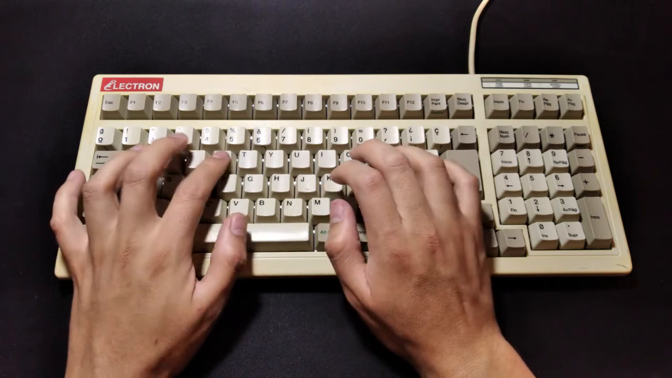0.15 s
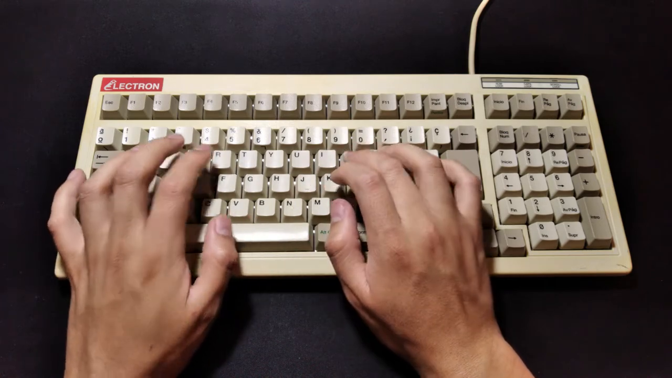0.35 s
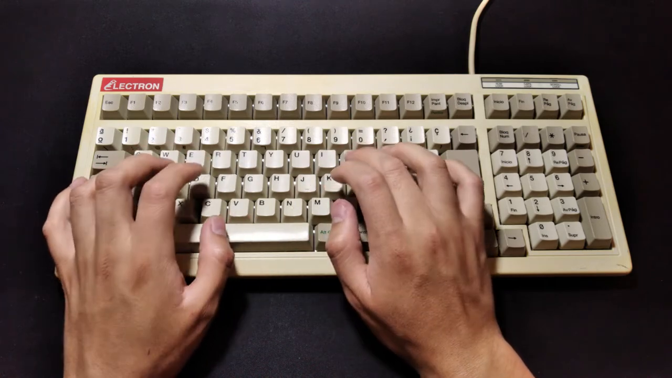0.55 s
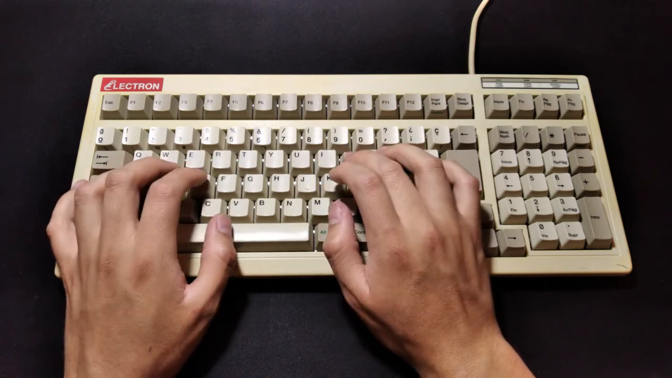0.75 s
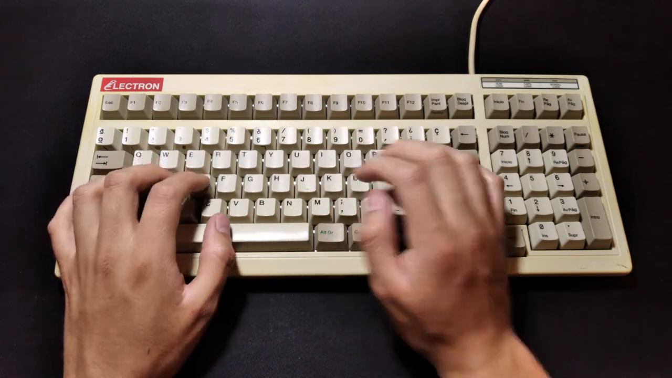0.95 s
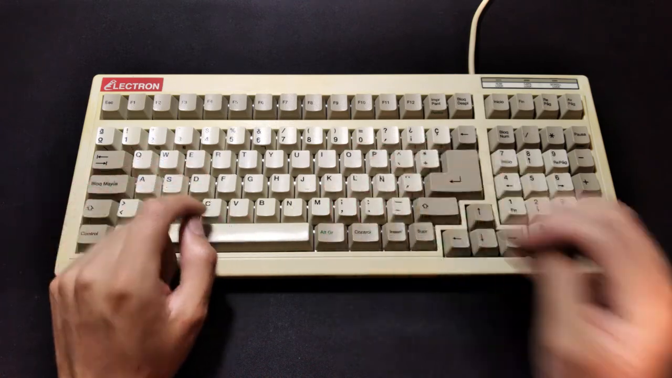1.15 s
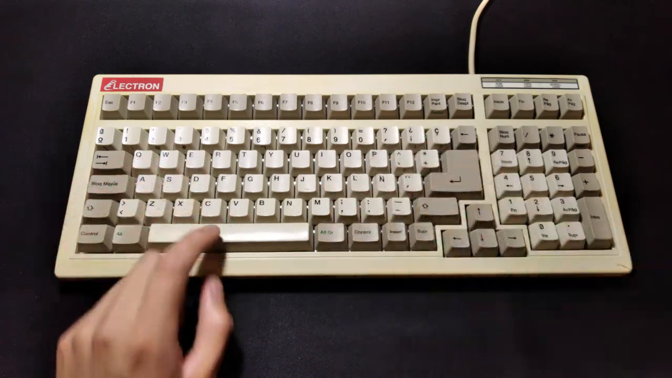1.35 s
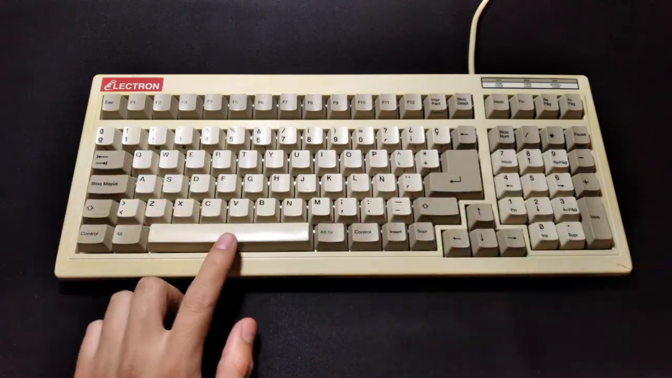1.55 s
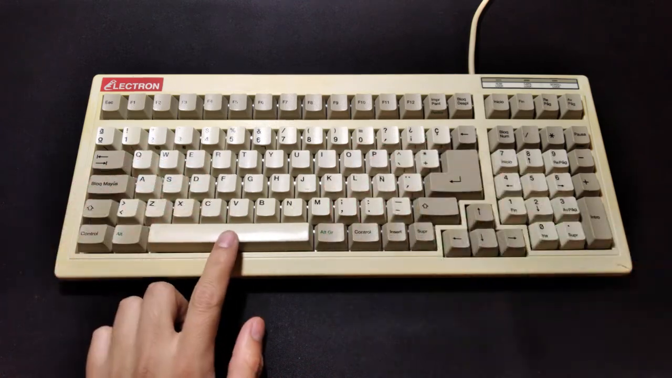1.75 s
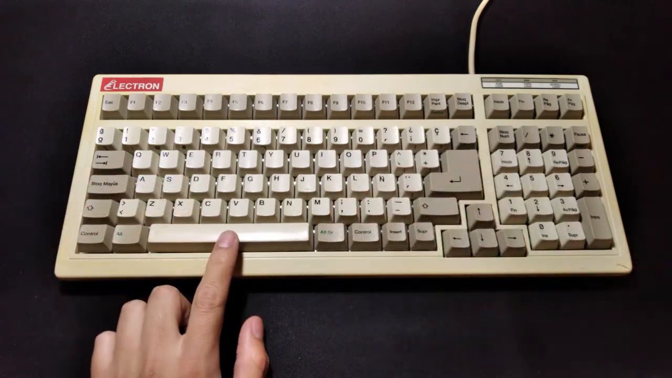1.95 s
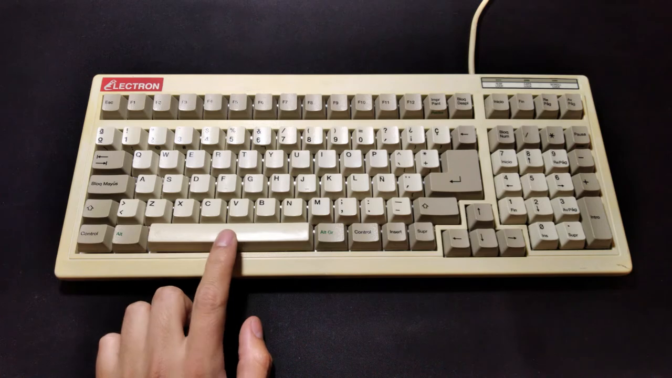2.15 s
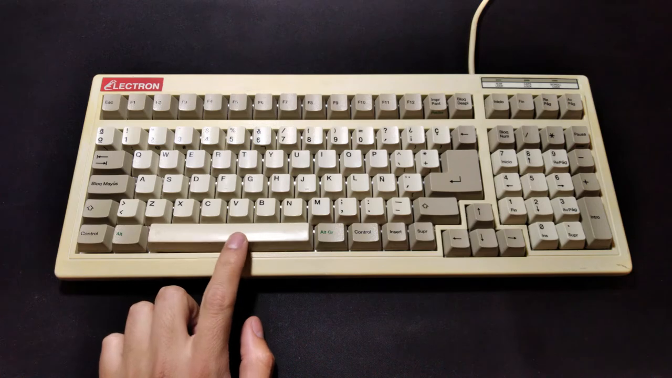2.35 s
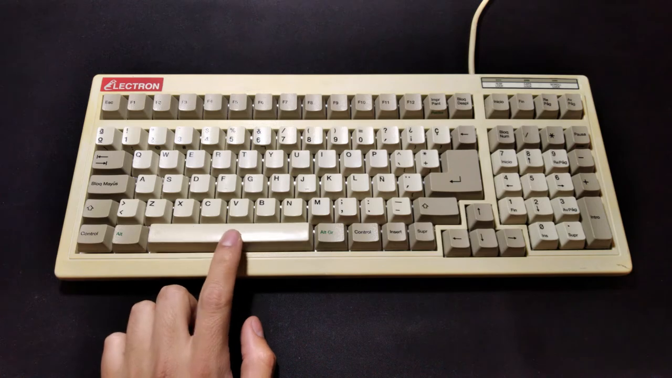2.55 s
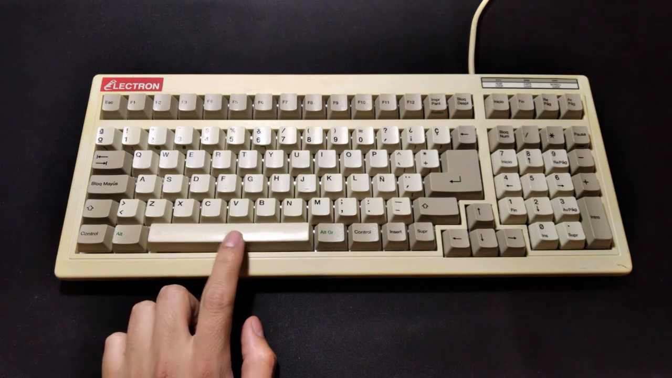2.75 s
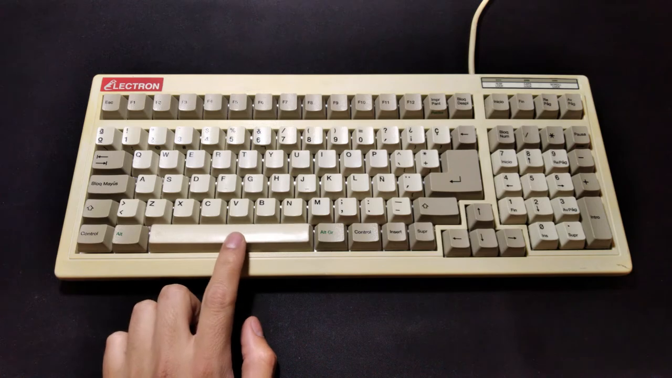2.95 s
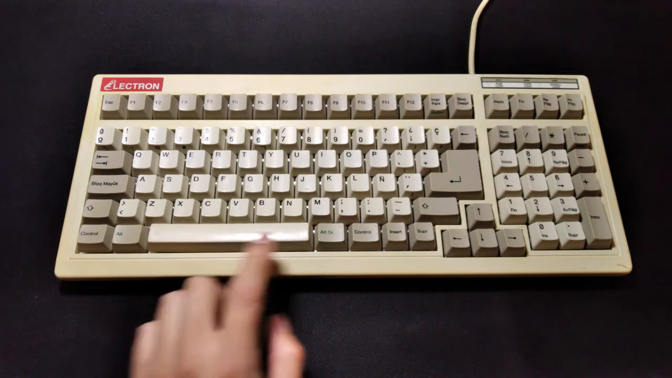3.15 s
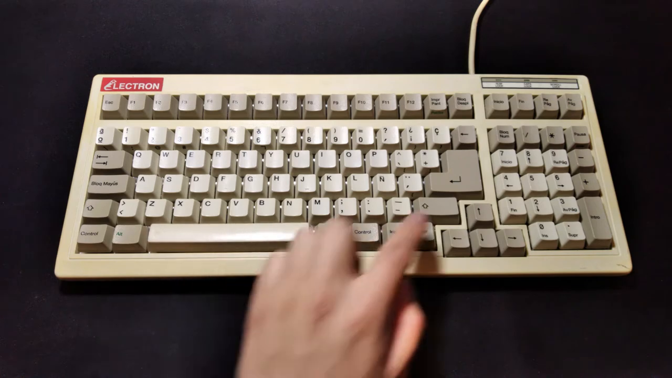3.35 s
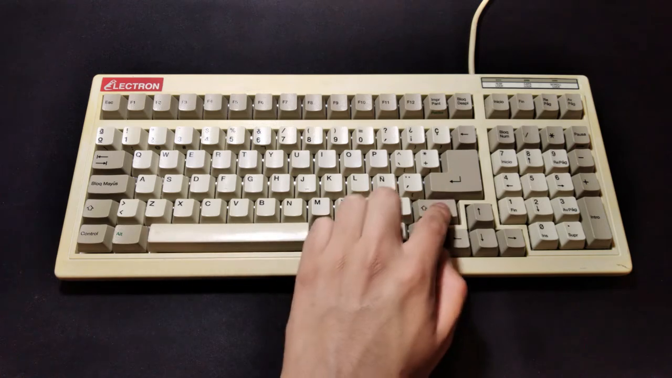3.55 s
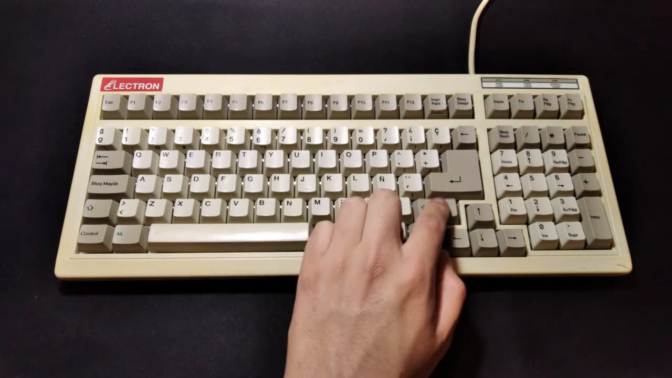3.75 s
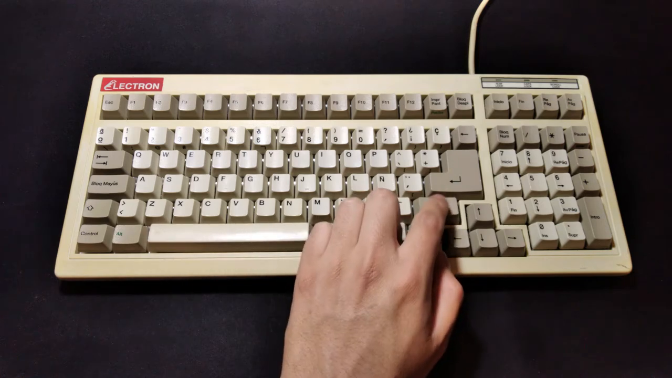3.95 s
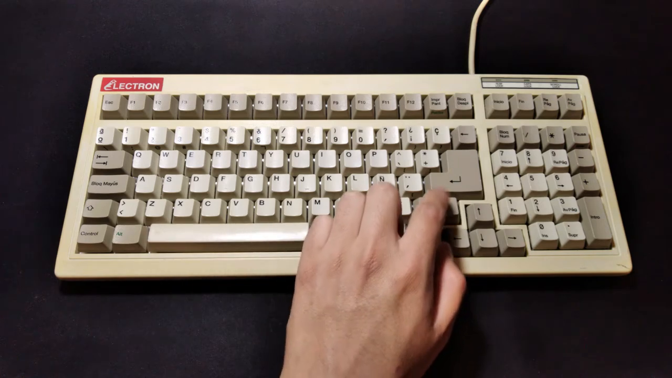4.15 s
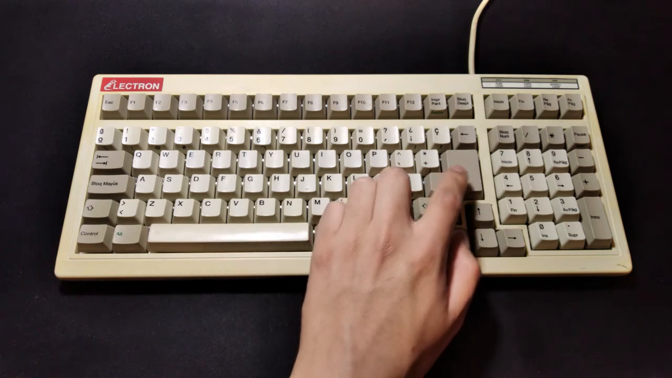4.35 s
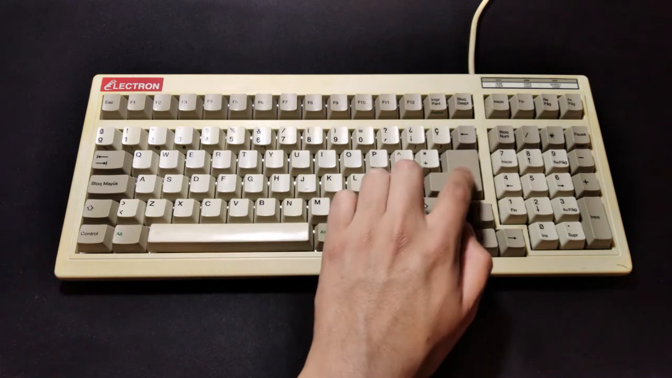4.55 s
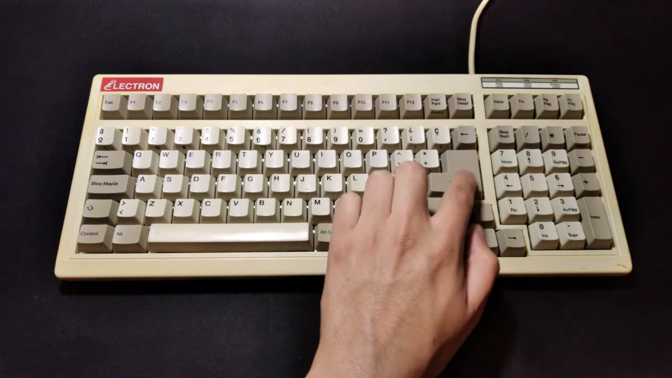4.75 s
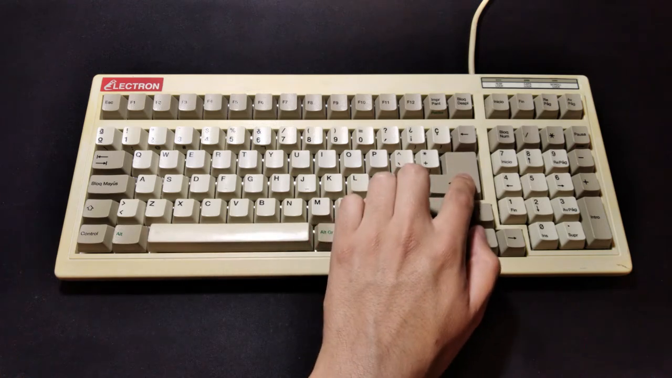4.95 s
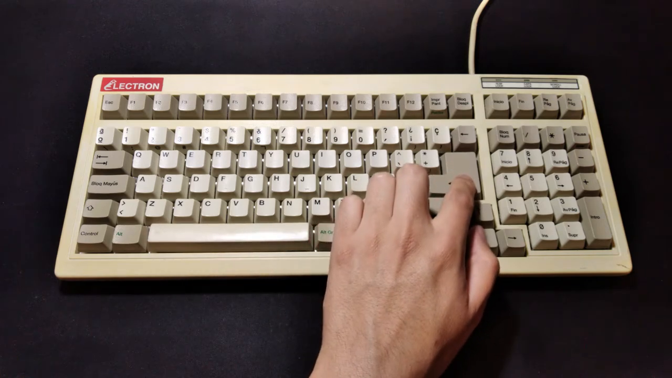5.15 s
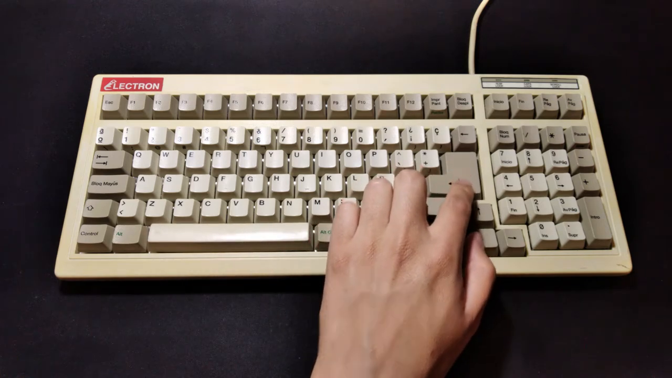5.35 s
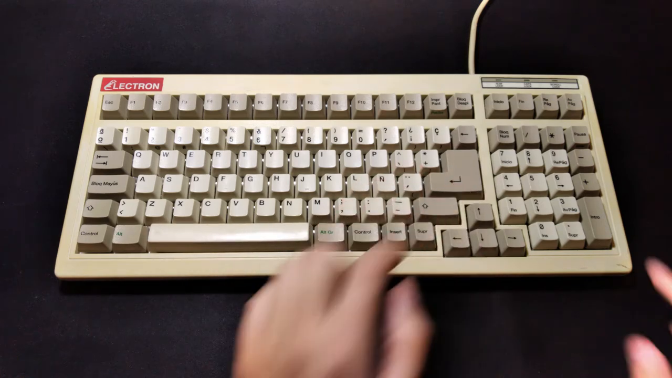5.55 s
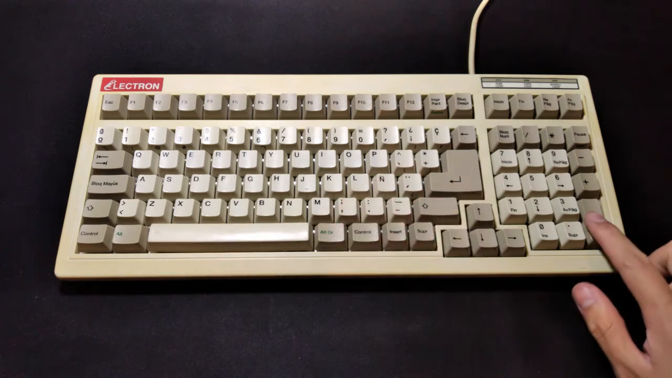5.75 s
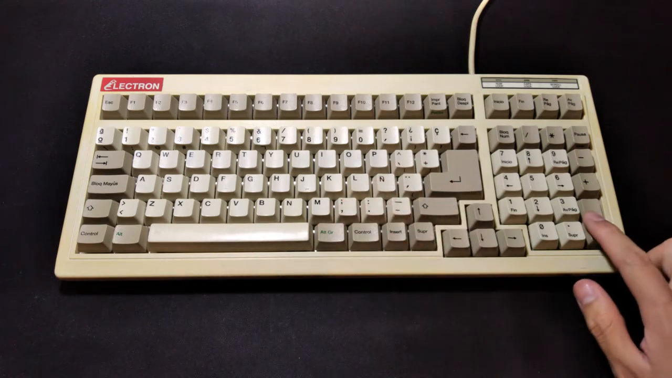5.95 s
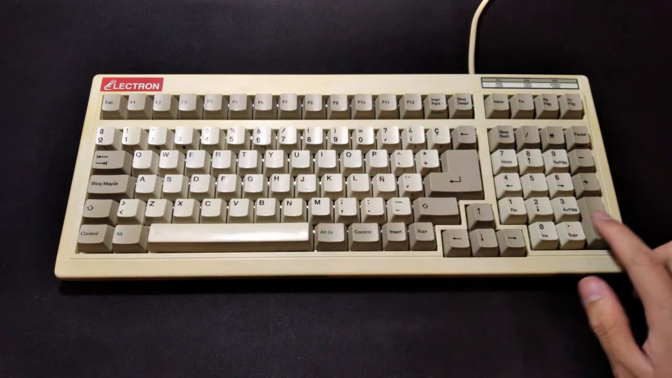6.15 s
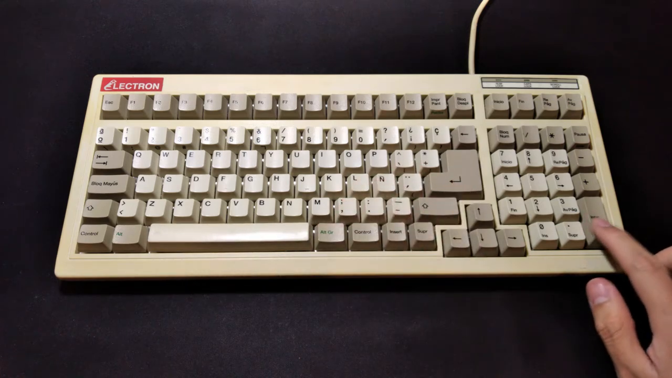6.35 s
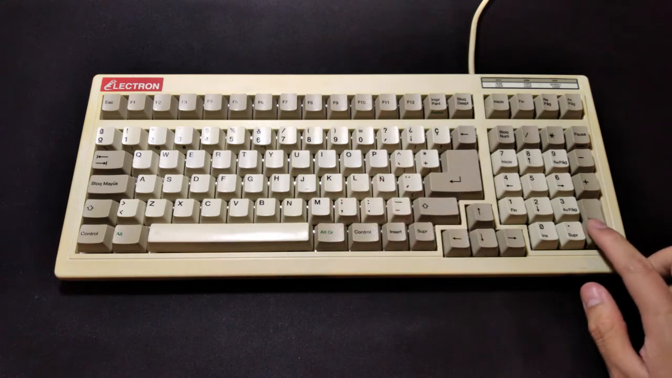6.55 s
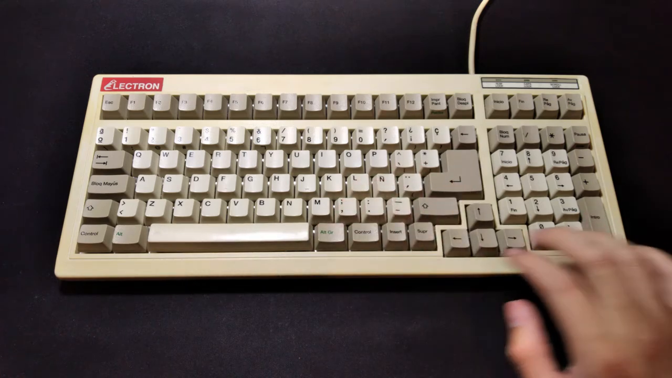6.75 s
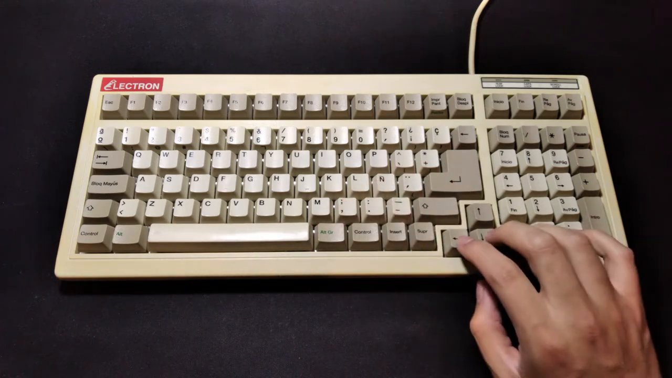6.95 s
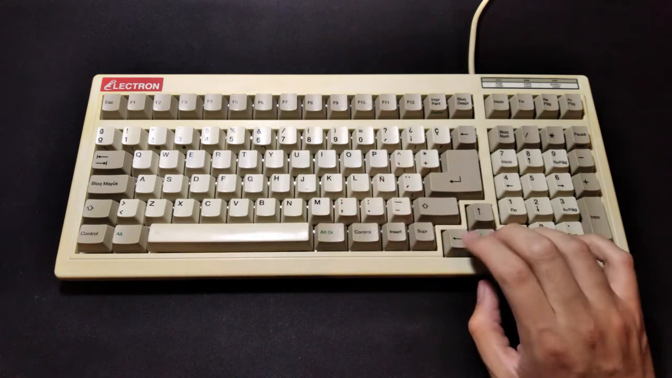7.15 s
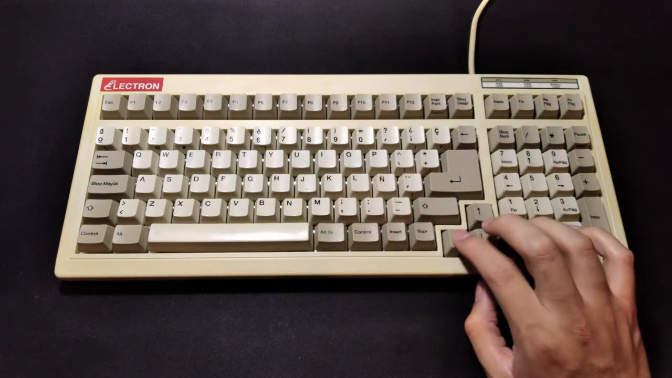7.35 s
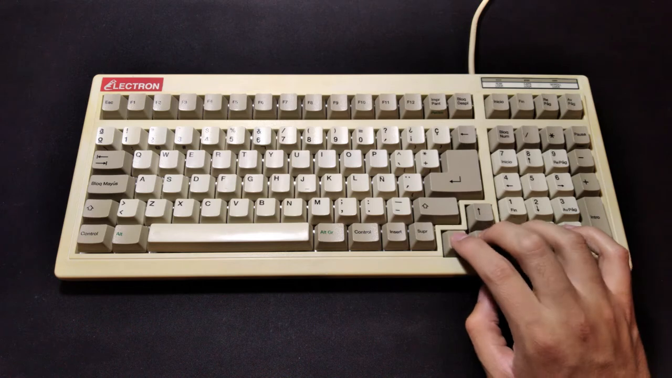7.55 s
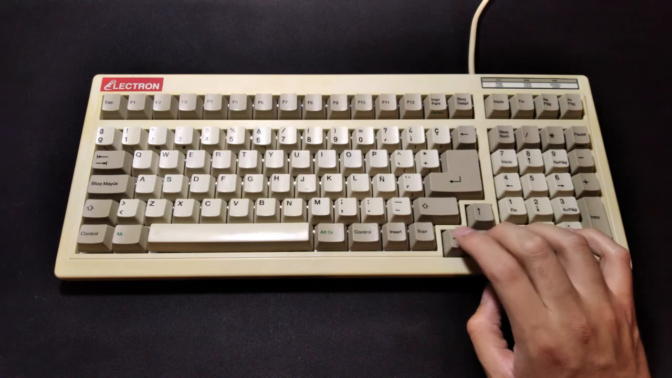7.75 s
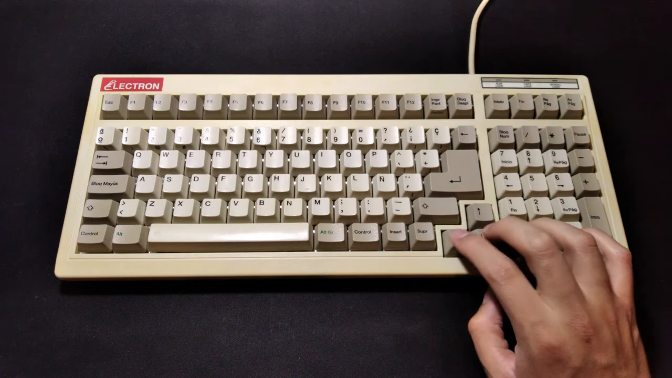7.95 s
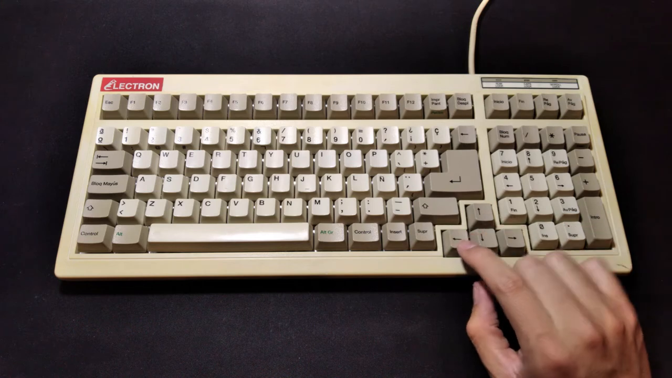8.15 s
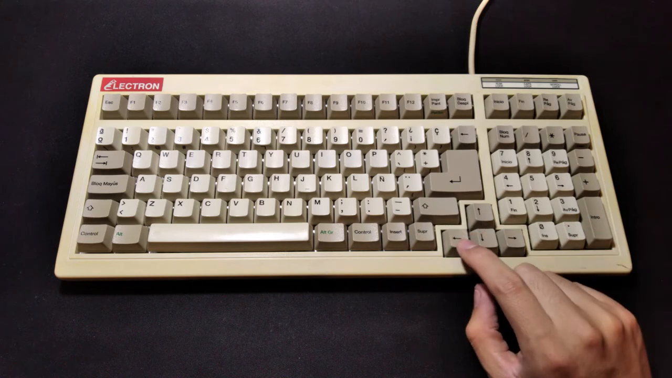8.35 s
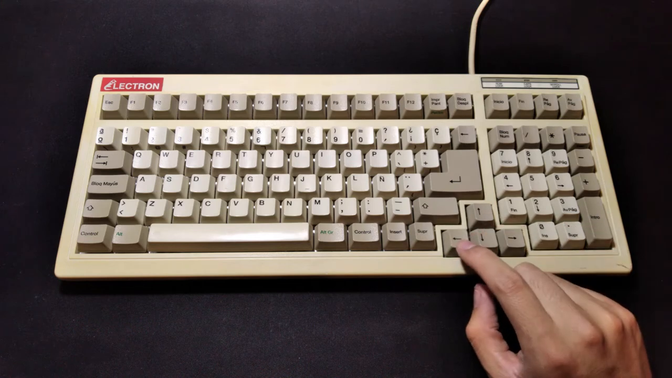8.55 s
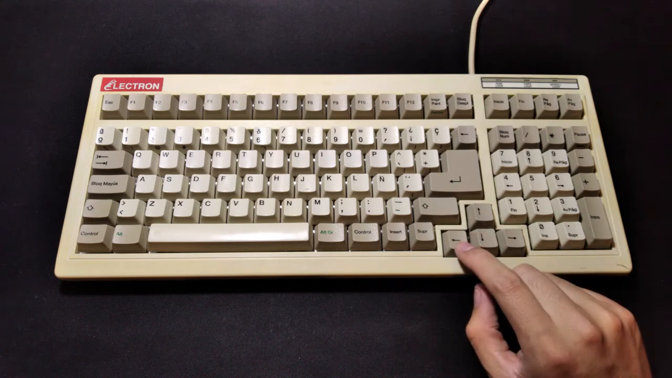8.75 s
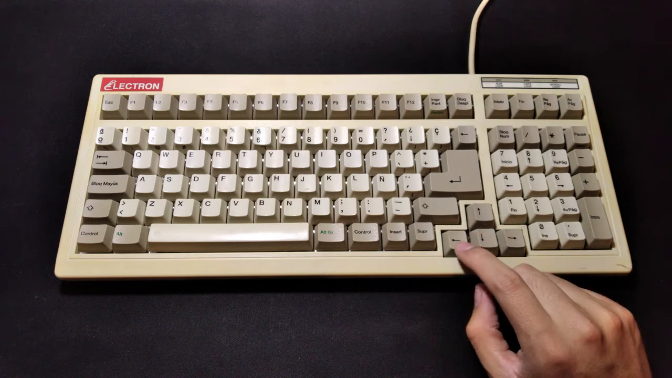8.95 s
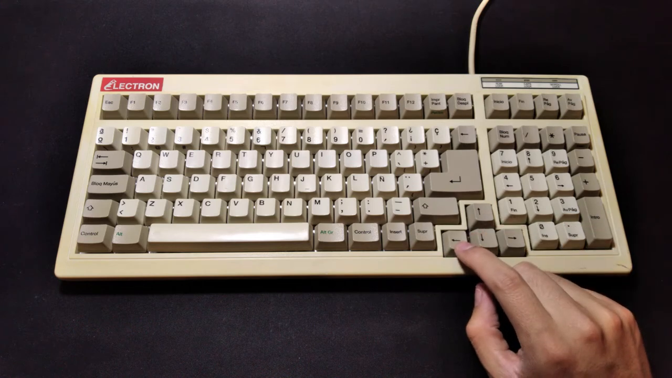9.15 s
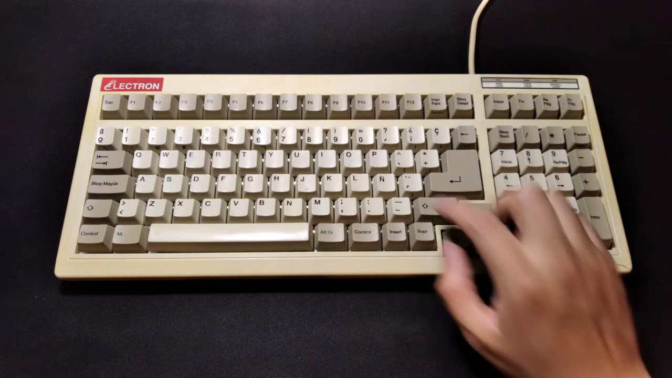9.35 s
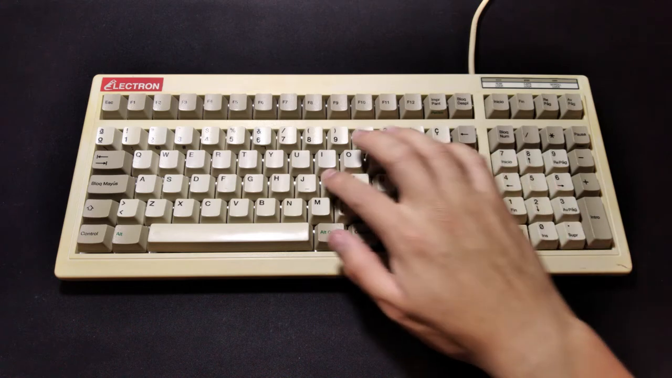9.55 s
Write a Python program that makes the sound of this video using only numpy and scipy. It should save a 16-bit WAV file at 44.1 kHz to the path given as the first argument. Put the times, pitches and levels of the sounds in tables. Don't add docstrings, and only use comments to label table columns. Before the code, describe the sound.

A clicky plastic keyboard on a desk, heard close in stereo in a small room with a soft low fan hum throughout. From 0 to 0.9 seconds letters are typed fast and unevenly, with crisp snaps and desk thumps. Only the fan and a barely audible touch remain until about 2.1, when the space bar is tapped steadily to 3.2, hollow and rattly, press and release alternating. Shift follows from 3.6 to 4.2 with firmer knocks, then enter from 4.5 to 5.5, the loudest and most solid. Number-pad enter clacks strongly from 5.8 to 6.7. A very faint distant whine falls in pitch near 6.7 to 7.1 amid light finger brushes. Several arrow keys patter in quick irregular clusters from 7.2 to 8.1, then one arrow is pressed slowly and softly from 8.3 to 9.3. A faint last touch comes near 9.7.

```python
import sys
import numpy as np
from scipy import signal
from scipy.fft import rfft, irfft, next_fast_len
from scipy.io import wavfile
from scipy.ndimage import uniform_filter1d, minimum_filter1d

SR = 44100
rng = np.random.default_rng(int(sys.argv[2]) if len(sys.argv) > 2 else 0)


def bounce(signal):
    frames = np.transpose(np.atleast_2d(signal))
    limited = np.clip(frames, -1, 1)
    pcm = np.round(limited * 32767).astype(np.int16)
    wavfile.write(sys.argv[1], SR, pcm)


def nominal_scale(level):
    x = np.asarray(level, float) / 20
    return 10 ** x


N = 427329

# start t/s, treble left-right/dB, left lag/samples, case ring/dB, rattle t60/s
KEY_GROUPS = [
    (0, -1.5, 2, 3, 0.07),
    (2, -1.5, 5, 2.5, 0.05),
    (3.4, 1, -1, -0.5, 0.063),
    (4.4, 1.5, -2.15, -4, 0.062),
    (5.6, 2, -3.5, 0, 0.071),
    (6.9, -0.8, -1.16, 1.6, 0.048),
]
# pitch f/Hz, rise/(Hz per dB of blow), rattle lead/ms, stem share of rattle/dB, of snap/dB
CAPS = [
    (1950, 30, .6, -4, -.6),
    (1420, 5, 1.8, -6, -2.5),
    (1370, 3, .3, 2.5, -.6),
    (1280, 40, .4, -3.5, -.6),
    (1180, 20, 1.2, -3, -7),
    (2090, 5, .6, -2.5, -7),
]

# contact t/s, knock level/dB, rattle level/dB; where the leaf snaps on the way also lead/ms, snap level/dB
LETTER_STROKES = [(.0826, -14, -30, 4, -18), (.14, -19, -34, 5, -22), (.186, -18, -28.5),
                  (.208, -19.5, -29, 5, -20.5), (.2862, -19.5, -35, 7.5, -20),
                  (.3857, -14.5, -30, 4.4, -15.5), (.478, -19, -34, 3, -31), (.5741, -16, -25.5, 7, -20.5),
                  (.6491, -14, -34, 4.3, -30.5), (.7231, -17, -36, 8, -24.5), (.7902, -19, -29.5, 10, -39),
                  (.8532, -13.5, -26, 4.7, -30), (.9162, -15.5, -22.5)]
SPACE_STROKES = [(2.1581, -17.5, -14.5, 8, -27.5), (2.2557, -18, -24), (2.3631, -19, -15, 12, -23),
                 (2.4647, -23.5, -31), (2.5459, -19.5, -15, 10, -21.5), (2.6391, -19, -24),
                 (2.743, -20.5, -18.5, 9.4, -24.5), (2.8224, -20, -23.5), (2.9212, -22, -17.5, 11, -26),
                 (3.0094, -23.5, -30), (3.0835, -22.5, -18, 11.3, -21.5), (3.1988, -17, -25)]
SHIFT_STROKES = [(3.6013, -12, -30, 7.3, -17.5), (3.7047, -12.5, -21.5, 7.7, -27),
                 (3.795, -12, -32, 9.6, -24), (3.8803, -14, -30, 4, -21.5), (3.9673, -17, -32, 10.7, -22),
                 (4.045, -11.5, -30, 5.4, -19), (4.1165, -17.5, -32, 10.6, -20),
                 (4.2217, -11.5, -24.5, 6.7, -28)]
ENTER_STROKES = [(4.5117, -7.5, -24, 7, -21.5), (4.6293, -12, -21), (4.7205, -13, -24.5, 20, -28),
                 (4.8072, -12, -22.5, 6, -32), (4.8853, -12.5, -24, 20, -26.5),
                 (4.9784, -13.5, -22.5, 6, -28), (5.0603, -12.5, -27, 12.6, -34),
                 (5.1411, -12, -21, 6.8, -30), (5.2245, -11.5, -27, 10.5, -27),
                 (5.2989, -11.5, -24.5, 4, -27.5), (5.3704, -9, -22.5, 7, -31), (5.485, -7.5, -18.5)]
PAD_STROKES = [(5.834, -12, -25.5, 10, -26), (5.9313, -9, -21, 8, -33), (6.0085, -12.5, -22.5, 6.7, -25.5),
               (6.0958, -9.5, -24, 6.8, -34), (6.1773, -10.5, -36, 6, -29.5), (6.2538, -9, -21, 6.4, -28),
               (6.3403, -12, -25, 10, -27.5), (6.4119, -14, -25), (6.5487, -17.5, -45),
               (6.6308, -9, -22.5, 8, -27), (6.7106, -13.5, -23)]
ARROW_STROKES = [(7.2391, -16, -24.5, 14, -27.5), (7.311, -21, -33), (7.3469, -17.5, -22, 8, -26),
                 (7.383, -15.5, -23), (7.4024, -16, -40), (7.4694, -15, -23.5),
                 (7.5864, -18, -36, 4, -29.5), (7.6887, -15.5, -25.5), (7.7223, -22, -24),
                 (7.791, -15.5, -21), (7.813, -21, -28.5), (7.8737, -21, -33.5), (8.0659, -20.5, -29)]
ONE_ARROW_STROKES = [(8.3084, -22.5, -25, 31, -45), (8.43, -25, -36.5, 7.7, -38),
                     (8.541, -23.5, -40, 39, -39), (8.6626, -20.5, -29, 8, -32),
                     (8.7855, -24, -37, 50, -38), (8.8953, -24.5, -35, 9.4, -33),
                     (9.0, -27, -40, 41, -40.5), (9.096, -21, -24.5, 8.3, -29),
                     (9.2143, -25.5, -40, 42, -37.5), (9.3174, -22.5, -40, 4, -33.5)]
STROKES = (LETTER_STROKES + SPACE_STROKES + SHIFT_STROKES + ENTER_STROKES + PAD_STROKES
           + ARROW_STROKES + ONE_ARROW_STROKES)
# t/s, knock level/dB, pitch f/Hz, sometimes rattle level/dB
TOUCHES = [(.0396, -21, 1070, -34.5), (.074, -36, 2550, -20), (1.183, -44, 2600, -46), (3.957, -28, 2380),
           (4.107, -22, 2270), (4.707, -22, 2000), (4.8665, -22.5, 1780), (5.0348, -30, 2300, -30),
           (5.201, -30, 2400, -28), (5.355, -26, 2000), (5.667, -49, 2500), (6.5054, -36, 1970, -30),
           (6.6114, -36.5, 830, -35.5), (7.0402, -36, 1900, -42), (7.0687, -36, 2060, -35),
           (7.0785, -34.5, 1640), (7.125, -31, 1520, -42), (7.136, -37.5, 1410), (7.218, -32, 1790),
           (7.5751, -25.5, 2160, -29.5), (7.6512, -25, 2230, -36), (7.9205, -27.5, 2210, -36),
           (7.9871, -31.5, 1280), (8.03, -31, 1620), (8.185, -39, 2000, -48), (8.226, -37, 1920, -47),
           (8.574, -33, 3500), (9.6788, -29.5, 1900, -33)]
# t/s, peak level/dB, stem share/dB
TICKS = [(.0335, -34.5, 2), (.1267, -20, -4), (.267, -30, -3), (.3774, -24, 0), (.488, -30, -3),
         (.6544, -26, -19), (.838, -36, -11), (.9228, -30.5, 4.5), (5.35, -30.5, 4), (5.436, -37.5, -2),
         (5.9923, -34, -2), (6.1498, -34.5, -2), (6.3194, -35, -4), (6.4868, -38, -10), (7.0225, -35, -6.5),
         (7.511, -43, -11), (7.6288, -25.5, -5), (7.8998, -28.5, -6), (9.332, -35, -24)]

# f/Hz, t60/s, level/dB under letters, space bar, shift, enter, number pad, arrows
DESK_MODES = [(130.3, 0.62, -9, -16.5, -21, -27, -18, -9), (177, 0.6, -19, -13, -22, -21.5, -18, -17),
              (263.2, 0.25, -9, -6.5, -22.5, -19, -20, -20), (299.4, 0.41, -12, -12, -20, -22.5, -16, -15),
              (393.5, 0.2, -28, -5.5, -20.5, -12.5, -16, -17), (464, 0.16, -15, -6, -17.5, -18.5, -23, -21)]
CASE_MODES = [(685, 0.18, -10.5, -5, -7.5, -8.5, -8.5, -11.5),
              (1078, 0.17, -17, -14.5, -18.5, -16, -13, -17.5),
              (1132, 0.069, -18.5, -3, -6, -17.5, -9, -15.5),
              (1416, 0.3, -24.5, -37.5, -20.5, -22.5, -20, -22),
              (1640, 0.27, -34.5, -18.5, -22, -18.5, -24, -21.5),
              (1890, 0.14, -11.5, -15.5, -13, -18.5, -11, -36.5),
              (2000, 0.11, -15, -18, -11, -11.5, -12, -19.5),
              (2170, 0.08, -7.5, -12, -11.5, -17, -10, -12.5),
              (2423, 0.035, -21.5, -12, -20.5, -17, -21, -14),
              (2860, 0.19, -20.5, -11, -18, -22.5, -25, -19), (3450, .05, -21, -9, -21, -30, -28, -36),
              (3750, 0.15, -28.5, -8, -14, -25, -30, -23.5)]
# f/Hz, level/dB under letters, space bar, shift, enter, number pad, arrows
LEAF_RESONANCES = [(5600, -8.5, -2.5, 1.5, -6.5, -4, -22.5), (6550, 2, -1, -6, -2.5, -3, -6.5),
                   (7350, -8, -8, -7, -12, -4, -12.5), (7780, -22, -6, 1, 2.5, -3, 7),
                   (7920, -0.5, 2, 2, -4, -5, -34), (8460, 3.5, -3, -2, 2, .5, 1.5),
                   (9300, -7.5, 2.5, -3, -4, -4, -15), (10470, -5, -1.5, -3.5, 3.5, -1.5, -12),
                   (13000, -19, -2, -9, -9.5, -9, -21.5), (14200, -13, -7, -10, -5, 1.5, -43)]
# f/Hz, left-right likeness/1
KEYBOARD_LIKENESS = [(300, 1), (1200, 0.56), (3000, 0.38), (7000, 0.2)]

# f/Hz, level/(dB per Hz)
FAN_SPECTRUM = [(45, -30), (68, -9), (108, -13.5), (122, 4.5), (140, -5), (215, -5), (244, 2.5),
                (275, -10.5), (450, -10), (800, -15.5), (1400, -19.5), (4100, -33.5), (5800, -34),
                (14000, -42)]
# f/Hz, left-right likeness/1
FAN_LIKENESS = [(60, 0.67), (240, 0.93), (950, 0.024), (3770, -0.18), (15000, 0.098)]
# t/s, f/Hz, level/dB
WHINE = [
    (6.7, 699, -87),
    (6.76, 690, -43.5),
    (7.082, 637, -48),
    (7.15, 650, -85),
]

# f/Hz, level/dB
OVERALL_TONE = [(30, -20), (60, -9.87), (4150, -4.05), (4300, -8.5), (7450, -12), (7650, -4.3),
                (14200, -4.3), (14500, -22), (15700, -22), (16100, -44)]
# f/Hz, left-right/dB
PORT_LEAN = [(60, 7.5), (240, 5.5), (950, -1), (3770, 0.0), (15000, 2)]

EVENT_LEN, LEAD_LEN, RING_LEN = 7168, 1024, 6144
TIME_S = (np.arange(EVENT_LEN) - LEAD_LEN) / SR


def knocks():
    t_s, db, cap_hz = blows()
    modes = np.array(DESK_MODES + CASE_MODES)
    mode_hz = modes[:, 0]

    peak_s = .0006
    blow_t60_s = .0038 * (cap_hz[:, None] / 1300) ** 1.4
    swell = np.exp(-((TIME_S - peak_s) / .0003) ** 2)
    push = np.where(TIME_S < peak_s, swell, nominal_scale(-60 * (TIME_S - peak_s) / blow_t60_s))
    blow = (push * np.sin(2 * np.pi * cap_hz[:, None] * (TIME_S - .0004)))[:, None]

    favour_db = -4 * np.log2(mode_hz.clip(600) / cap_hz[:, None]) ** 2
    levels_db = modes[:, 2:].T[group(t_s)] + favour_db
    case = rings(modes[:, :2], levels_db, spread_db=1.8, rise_s=0.0037)

    def colour_db(hz):
        return np.array([along([(60, -70), *zip(mode_hz, row), (9000, -48)], hz) for row in levels_db])

    after = 1 - np.exp(-np.maximum(TIME_S, 0) / 0.0011)
    decay = nominal_scale(-60 * TIME_S / 0.033) + nominal_scale(-10.5 - 60 * TIME_S / .2)
    scatter = pair(len(t_s), EVENT_LEN, colour_db, KEYBOARD_LIKENESS) * after * decay
    chatter = uniform_filter1d(rng.standard_normal((len(t_s), 1, EVENT_LEN)), 45)
    scatter = scatter * nominal_scale(18 * chatter)

    body = nominal_scale(in_force(t_s, column=3)) * (nominal_scale(-4.5) * case + nominal_scale(-.3) * scatter)
    sounds = nominal_scale(db)[:, None, None] * (nominal_scale(9) * blow + body)
    pan_db = .06 * in_force(t_s, column=1).ravel()
    return placed(sounds, t_s, pan_db)


def blows():
    t_s, db = np.transpose([row[:2] for row in STROKES])
    usual_db = np.array([db[group(t_s) == g].mean() for g in group(t_s)])
    cap_hz, rise_hz = np.array(CAPS)[group(t_s), :2].T
    scatter = 1 + .05 * rng.standard_normal(len(t_s))
    pitch_hz = (cap_hz + rise_hz * (db - usual_db)) * scatter
    return np.transpose([*zip(t_s, db, pitch_hz), *(row[:3] for row in TOUCHES)])


def rings(modes, levels_db, spread_db, rise_s):
    t = np.arange(RING_LEN) / SR
    out = np.zeros((len(levels_db), 2, EVENT_LEN))
    for (hz, t60_s), db in zip(modes, levels_db.T[..., None]):
        level, tune, phase, lead, beat = rng.standard_normal((len(db), 5)).T[..., None]
        swing = nominal_scale(db + spread_db * level - 70 * t / t60_s) * (1 - np.exp(-t / rise_s))
        beat_turn = 2 * np.pi * 0.0318 * hz * beat * t + 4 * phase
        swing = swing * (1 + 1.25 * np.sin(beat_turn.astype(np.float32)))
        for port in range(2):
            port_phase = port * lead * min(hz / 2500, 1.5)
            turn = 2 * np.pi * hz * (1 + 0.013 * tune) * t + 3 * phase + port_phase
            out[:, port, LEAD_LEN:LEAD_LEN + len(t)] += swing * np.sin(turn.astype(np.float32))
    return out


def clicks():
    t_s, db, stem_db = snaps()
    table = np.array(LEAF_RESONANCES)
    levels_db = table[:, 1:].T[group(t_s)] + 3.8 * rng.standard_normal((len(t_s), len(table)))

    def leaf_db(hz):
        return np.array([along([(1500, -40), *zip(table[:, 0], row), (16500, row[-1] - 6)], hz)
                         for row in levels_db])

    def stem_colour_db(hz):
        return along([(1200, -6.5), (3900, 5.5), (5500, -7.5), (9000, -10.5)], hz)[None]

    leaf = pair(len(t_s), EVENT_LEN, leaf_db, KEYBOARD_LIKENESS)
    stem = pair(len(t_s), EVENT_LEN, stem_colour_db, KEYBOARD_LIKENESS)
    bounces = uniform_filter1d(rng.standard_normal((len(t_s), 1, EVENT_LEN)), 25)
    spikes = nominal_scale(3.4 * bounces * 6.5)

    snap = nominal_scale(2.5) * fade(0.0073, 0.00016)
    rattle = nominal_scale(-4) * spikes * fade(in_force(t_s, column=4), 0.002)
    room_tail = nominal_scale(-17.5) * fade(0.27, 0.0011)
    source = nominal_scale(.7) * leaf + nominal_scale(stem_db - .3)[:, None, None] * stem
    sounds = nominal_scale(db)[:, None, None] * source * (snap + rattle + room_tail)
    return placed(sounds, t_s + 0.00053, in_force(t_s, column=1).ravel())


def snaps():
    def cap(t_s):
        return CAPS[group(t_s)]

    rows = [(t - cap(t)[2] / 1e3, db, cap(t)[3]) for t, _, db, *_ in STROKES]
    rows += [(t - leaf[0] / 1e3, leaf[1], cap(t)[4]) for t, _, _, *leaf in STROKES if leaf]
    rows += [(t, rattle[0], cap(t)[3]) for t, _, _, *rattle in TOUCHES if rattle]
    # lead/ms, level/dB, stem share/dB
    bar_slack, shift_slack = (16, -38, -14), (9, -39, 3)
    for strokes, (lead_ms, db, stem_db) in ((SPACE_STROKES, bar_slack), (SHIFT_STROKES, shift_slack)):
        rows += [(t - (leaf[0] + lead_ms) / 1e3, db, stem_db) for t, _, _, *leaf in strokes[2:] if leaf]
    return np.transpose(rows + TICKS)


def fade(t60_s, rise_s):
    return np.where(TIME_S < 0, np.exp(np.minimum(TIME_S, 0) / rise_s), nominal_scale(-60 * TIME_S / t60_s))


def group(times_s):
    return np.searchsorted(np.array(KEY_GROUPS)[:, 0], times_s, side="right") - 1


def in_force(times_s, column):
    return np.array(KEY_GROUPS)[group(times_s), column][:, None, None]


def placed(sounds, times_s, pans_db):
    out = np.zeros((2, N + 2 * EVENT_LEN))
    lags = in_force(times_s, column=2).ravel()
    for sound, t_s, pan_db, lag in zip(sounds, times_s, pans_db, lags):
        for port, sign in enumerate((.5, -.5)):
            start = round(t_s * SR + sign * lag)
            out[port, start:start + EVENT_LEN] += nominal_scale(sign * pan_db) * sound[port]
    return out[:, LEAD_LEN:LEAD_LEN + N]


def pair(count, size, colour_db, alike):
    hz = np.fft.rfftfreq(size, 1 / SR)
    turn = np.arccos(np.clip(along(alike, hz), -1, 1)) / 2
    z = rfft(rng.standard_normal((count, 2, size))) * nominal_scale(colour_db(hz))[..., None, :]
    mid, side = z[:, 0] * np.cos(turn), z[:, 1] * np.sin(turn)
    x = irfft(np.stack([mid + side, mid - side], axis=1), size)
    return x / x.std(axis=(1, 2), keepdims=True)


def along(points, hz):
    f, v = np.transpose(points)
    return np.interp(np.log(hz + 1), np.log(f + 1), v)


def room():
    fan = pair(1, next_fast_len(N), lambda hz: along(FAN_SPECTRUM, hz)[None], FAN_LIKENESS)[0, :, :N]
    t_s, hz, db = np.transpose(WHINE)
    t = np.arange(N) / SR
    phase = 2 * np.pi * np.cumsum(np.interp(t, t_s, hz)) / SR
    whine = nominal_scale(np.interp(t, t_s, db, -150, -150)) * np.sin(phase)
    return nominal_scale(-39.5) * fan + whine


def scene():
    return knocks() + clicks() + room()


def filtered(x, response):
    m = next_fast_len(x.shape[-1])
    return irfft(rfft(x, m) * response(np.fft.rfftfreq(m, 1 / SR)), m)[..., :x.shape[-1]]


def flutter(x, depth_db):
    hz, _, z = signal.stft(x, SR, nperseg=512)
    weak = (hz > 4250) & (hz < 7650)
    level_db = 10 * np.log10(np.mean(abs(z[:, weak]) ** 2, axis=(0, 1)) + 1e-14)
    nearby_peak_db = -minimum_filter1d(-level_db, size=25)
    masked = np.clip((nearby_peak_db - level_db - 7) / 6, 0, 1)
    masked = np.maximum(masked, .14 * (level_db < np.median(level_db)))
    patches = rng.standard_normal((len(hz) // 3 + 1, z.shape[-1] // 10 + 1))
    patches = patches.repeat(3, axis=0).repeat(10, axis=1)[:len(hz), :z.shape[-1]]
    duck_db = -depth_db * (patches > .6) * weak[:, None] * masked
    return signal.istft(z * nominal_scale(duck_db), SR, nperseg=512)[1][:, :N]


def roll_off(x):
    return signal.sosfilt(signal.butter(12, 16800, fs=SR, output="sos"), x)


def record(dry):
    def port_response(hz):
        return nominal_scale(along(OVERALL_TONE, hz) + along(PORT_LEAN, hz) * np.array([[.5], [-.5]]))

    heard = flutter(filtered(dry, port_response), depth_db=32)
    return roll_off(np.clip(heard, -1, 1))


dry = scene()
out = record(dry)
bounce(out)
```